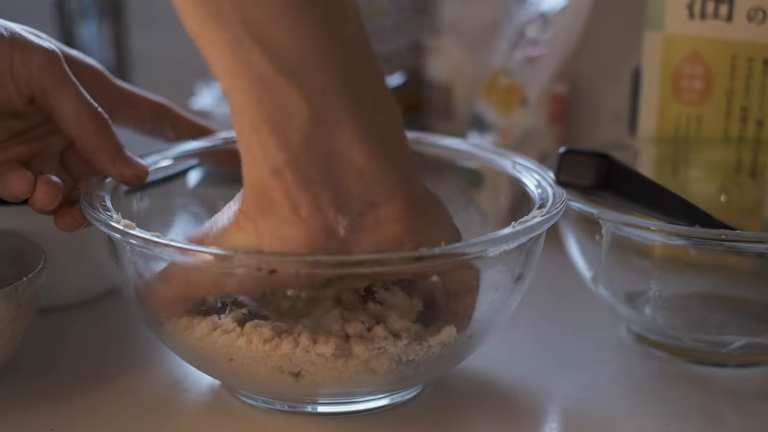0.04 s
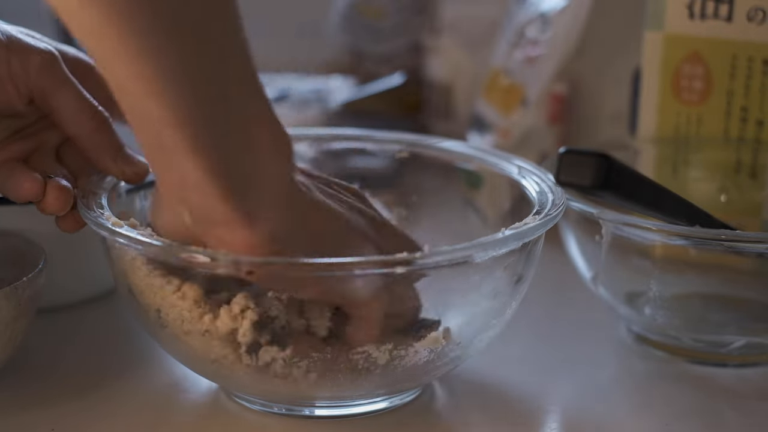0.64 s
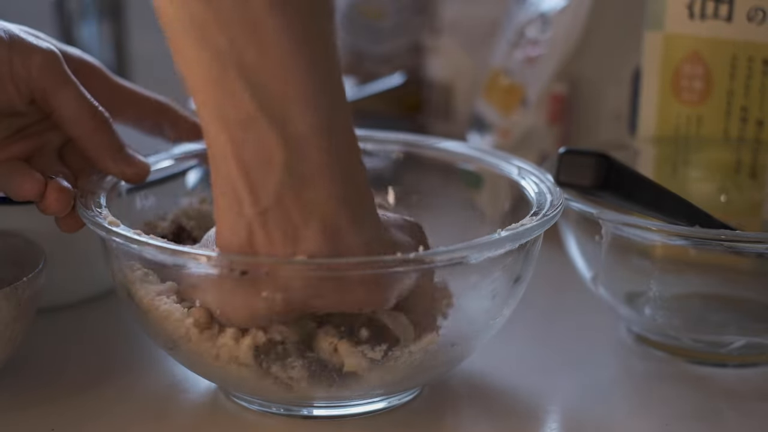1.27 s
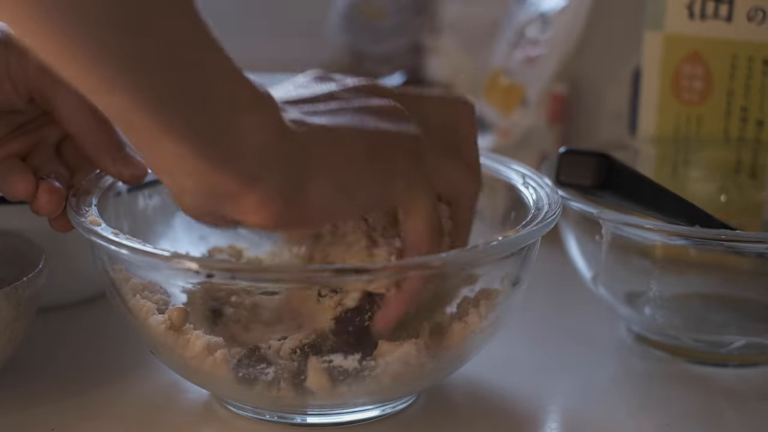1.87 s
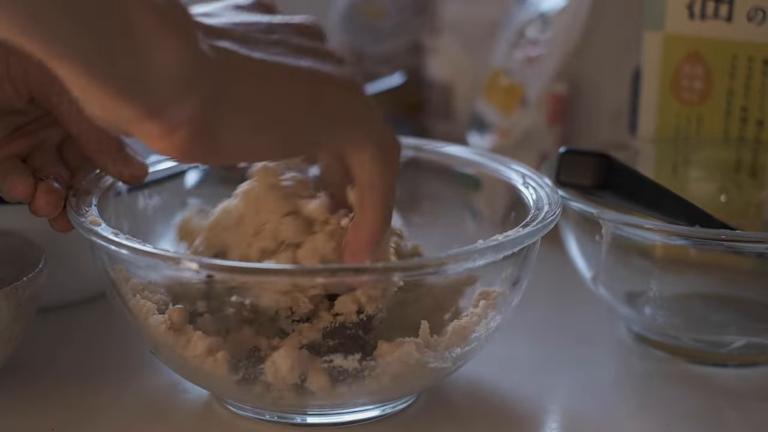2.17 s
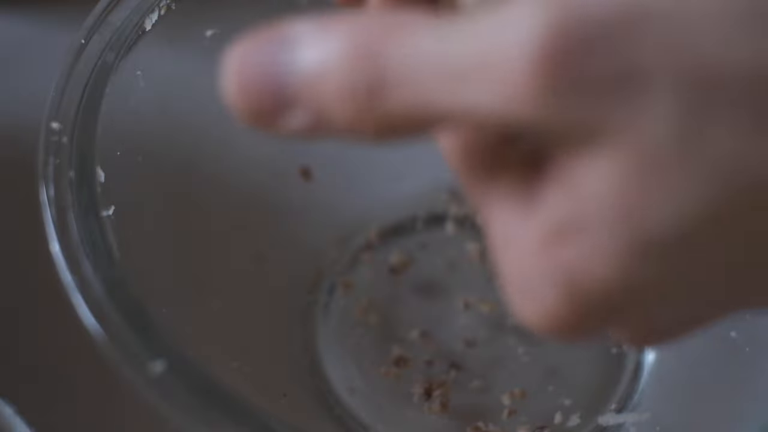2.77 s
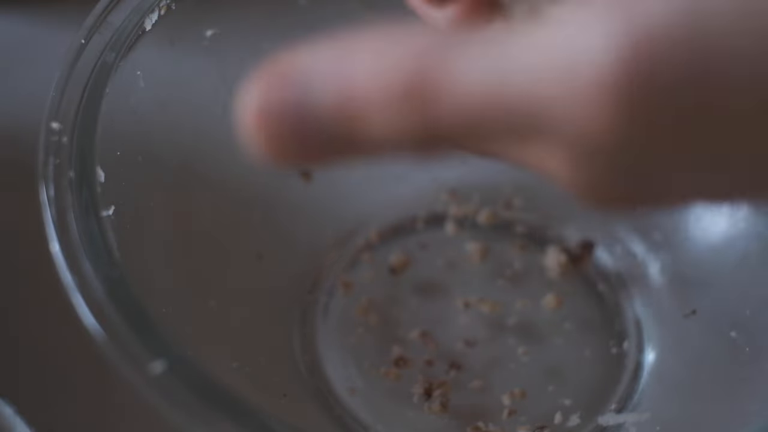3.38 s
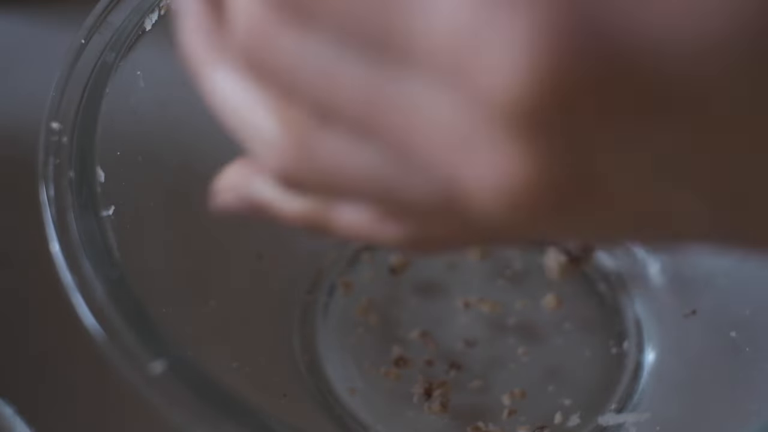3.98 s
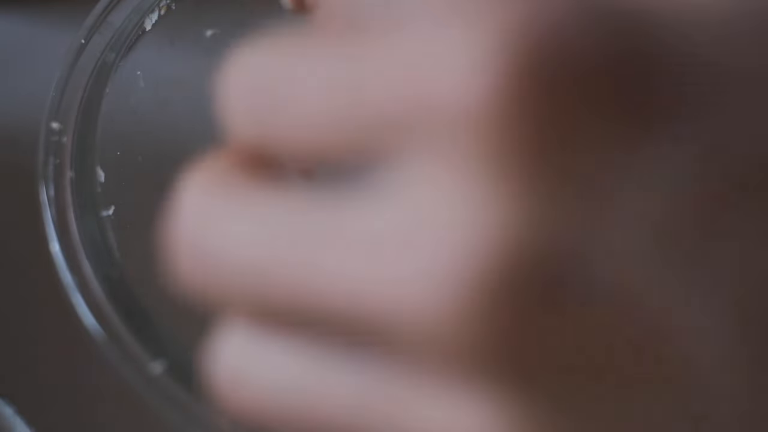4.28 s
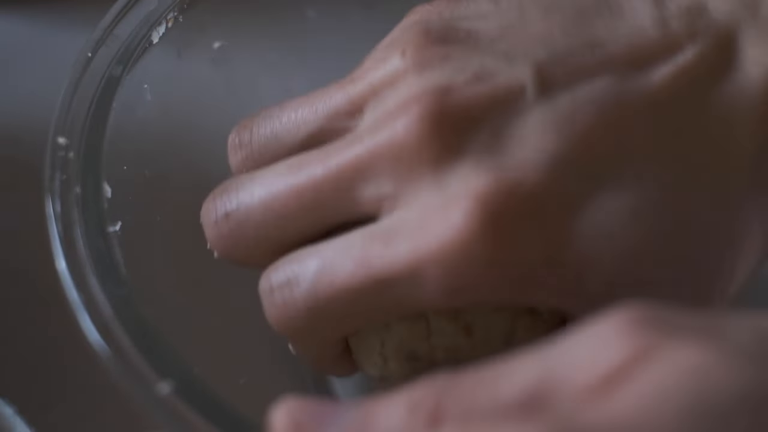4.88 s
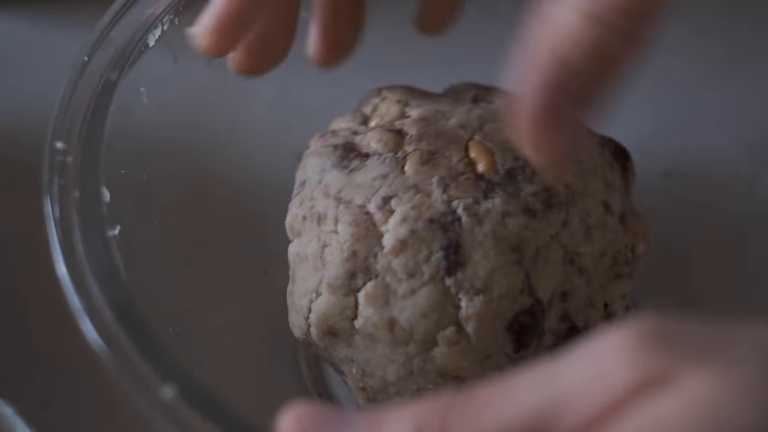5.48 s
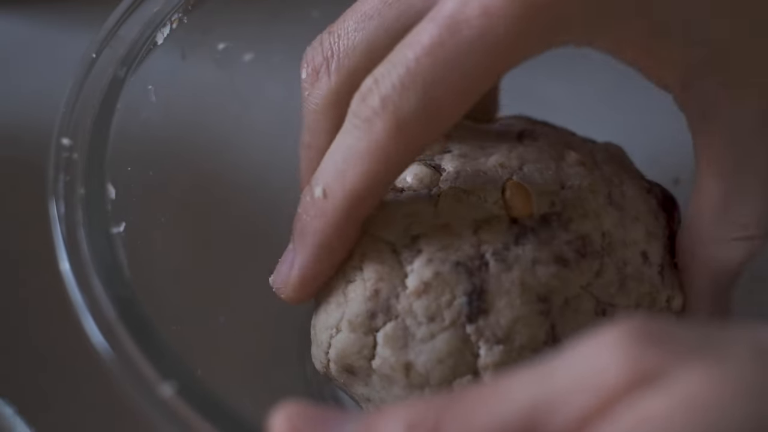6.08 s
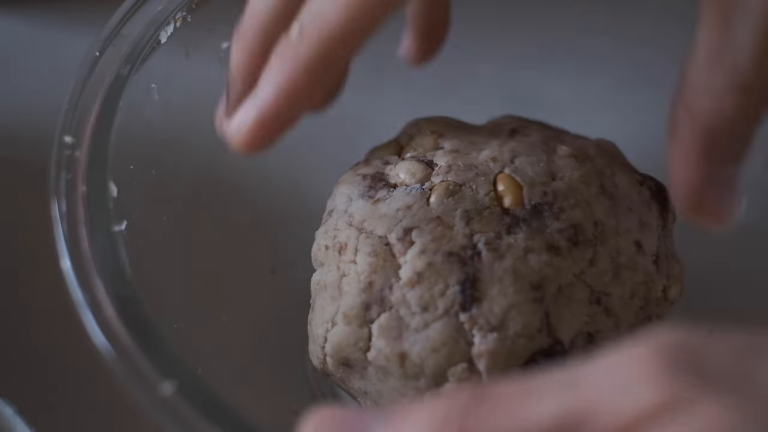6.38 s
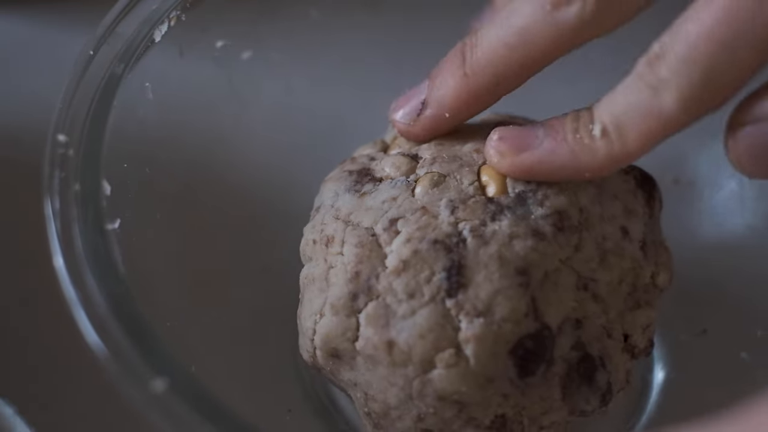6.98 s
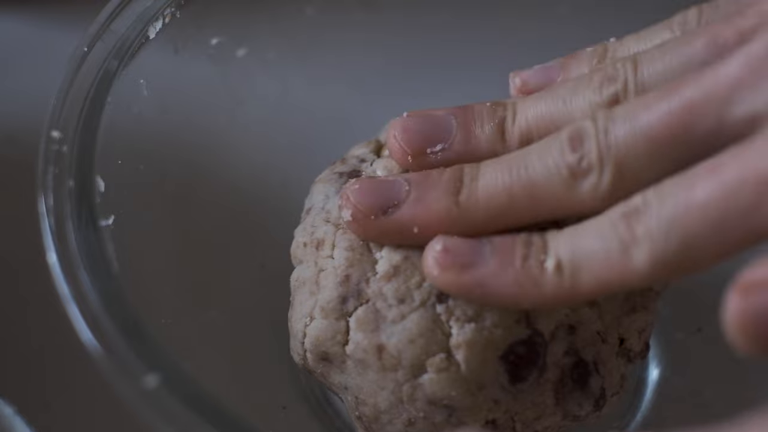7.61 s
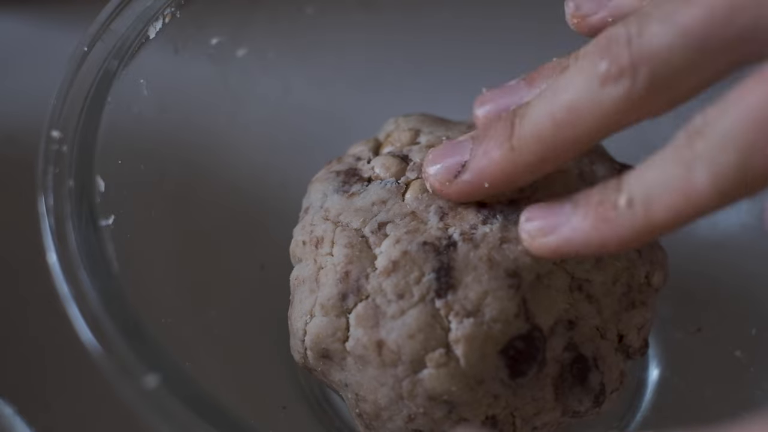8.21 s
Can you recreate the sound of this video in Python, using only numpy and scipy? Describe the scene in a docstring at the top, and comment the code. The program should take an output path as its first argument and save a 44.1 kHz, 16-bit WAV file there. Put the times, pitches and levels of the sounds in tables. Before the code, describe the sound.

Hands work crumbly dough in a glass bowl, heard close and nearly mono in a quiet kitchen with faint hiss and appliance hum. For the first 2.4 seconds they squeeze it: the dough rubs, crumbs snap sharply near 0.1 seconds, nails graze the glass, and the bowl knocks on the counter with low thuds, strongest around 1.1 to 1.2 seconds and again at 1.7. A brief, dull creak of skin on glass comes near 1.6. From about 2.5 seconds it is quieter, as the lump passes between palms with soft, moist slaps near 3.2 and 4 seconds. At 4.5 it drops into the bowl with the heaviest thud. Fingers then pat it into a ball, with soft thumps and tiny air pops, firmest around 5.5 seconds. Lighter, scattered pats continue until about 8.2, while tacky skin brushes the dough and peels away.

```python
"""Hands work crumbly dough in a glass bowl, close up and nearly mono in a quiet kitchen.
First they squeeze it: crumbs snap, nails scrape the glass, the bowl knocks and the counter thuds.
From about 2.5 s the lump is out of the bowl, passing from palm to palm with soft, moist slaps.
Near 4.5 s it drops back with the heaviest thud. Then fingers pat it into a ball, popping
little pockets of air, while tacky skin brushes the dough and peels away."""
import sys
import numpy as np
from scipy import signal
from scipy.fft import rfft, irfft, next_fast_len
from scipy.io import wavfile

SR = 44100
rng = np.random.default_rng(int(sys.argv[2]) if len(sys.argv) > 2 else 0)


def to_wav(s):
    """Save 16-bit WAV."""
    ch = np.atleast_2d(s).T  # columns
    pcm = np.round(np.clip(ch, -1, 1) * 32767)  # PCM
    wavfile.write(sys.argv[1], SR, pcm.astype(np.int16))


N = 363825
T = np.arange(N) / SR


# The low end, fist into dough or lump into bowl: (time [s], level [dB], pitch [Hz], swell [s])
DOUGH_THUDS = [(0.01, -43, 220, 0.029), (0.071, -26, 97, 0.011), (.149, -30.5, 174, 0.005),
               (0.469, -47, 114, 0.019), (0.758, -45.5, 190, 0.0096), (1.054, -32.5, 115, 0.019),
               (1.098, -19.5, 169.5, 0.0093), (1.219, -16, 99, 0.0032), (1.222, -29.5, 219.4, 0.014),
               (1.548, -44, 87, 0.024), (1.705, -36, 106, 0.01), (1.739, -32.5, 214.4, 0.02),
               (2.148, -49.5, 202, 0.011), (2.312, -42, 192, 0.0073), (2.336, -45.5, 82, 0.011),
               (4.461, -11.5, 88.2, 0.014), (4.493, -27, 221, 0.0067)]

def thuds(counter_db=-9):
    """Heavy pushes go through the dough and set the counter top ringing."""
    out = np.zeros(N)
    for s, db, hz, swell in DOUGH_THUDS:
        add(out, s, push(db, hz, swell))
    return out + undb(counter_db) * counter(out)


def push(db, hz, swell, softness=2.8, overtone_db=-20, firm_db=-20):
    """Soft dough takes a load gradually: a few low cycles swell and die."""
    t = T[:SR // 4]
    load = (t / swell * np.exp(1 - t / swell)) ** softness
    phase = 2 * np.pi * hz * t
    # dough stiffens as it is squashed, so an overtone grows late in the firmer pushes
    stiffness = np.minimum(t / swell, 2) * min(undb(db - firm_db), 1) ** .5
    return -undb(db) * load * (np.sin(phase) + undb(overtone_db) * stiffness * np.sin(2 * phase))


# Boomy modes of the counter top: (pitch [Hz], level [dB], t60 [s])
COUNTER_MODES = [(62, -2, 0.25), (92.9, 3.5, 0.33), (220, -2, 0.51), (271, -2, 0.12)]

def counter(pushes):
    """The counter top carries the bowl and rings on under its load."""
    return resonate(pushes, COUNTER_MODES)


# Fingers shape the ball: (time [s], thud level [dB], pop level [dB])
FINGER_PATS = [(4.663, -30.5, -42), (4.753, -34, -37.5), (4.901, -39.5, -40.5), (5.058, -43, -53.5),
               (5.27, -34.5, -32), (5.404, -28, -42.5), (5.494, -21, -39.5), (5.558, -28.5, -62),
               (5.991, -37, -58), (6.223, -48, -54), (6.643, -46, -59), (6.785, -42.5, -58),
               (7.057, -44.5, -48), (7.49, -53, -46), (7.561, -28, -48), (7.833, -47.5, -47),
               (7.966, -39, -50), (8.11, -49.5, -49.5), (8.182, -33, -46.5)]

def pat_thuds(hz=94.6, swell_s=0.013, lead_s=0.0029, counter_db=-19):
    """The soft body of each pat starts just before its pop and barely stirs the counter."""
    out = np.zeros(N)
    for s, db, _ in FINGER_PATS:
        add(out, s - lead_s, push(db, hz, swell_s, softness=5.7))
    return out + undb(counter_db) * counter(out)


def pat_pops(hz=884, decay_s=0.0023, stagger_s=0.01, finger_gains_db=(4, -3)):
    """Air trapped under a fingertip pops and tacky skin ticks; a second finger lands just after."""
    out, t = np.zeros(N), T[:SR // 20]
    for s, _, db in FINGER_PATS:
        for finger, gain_db in enumerate(finger_gains_db):
            skin = unit(band(rng.standard_normal(len(t)), 2200, 1))
            phase = 2 * np.pi * hz * (1 + 0.046 * rng.standard_normal()) * t
            pop = np.sin(phase) + undb(-6) * np.sin(1.38 * phase) + undb(-11) * skin
            late = finger * stagger_s * (.5 + rng.random())
            add(out, s + late, undb(db + gain_db) * pop * np.exp(-t / decay_s))
    return out


# Soft landings in a palm: (time [s], level [dB], pitch [Hz])
PALM_CATCHES = [(2.975, -45, 111), (3.153, -34, 104), (4.016, -32.5, 89.5), (4.283, -38.5, 135)]

def catches(swell_s=0.0059):
    """A palm stops the lump in the air with a short, dead thump."""
    out = np.zeros(N)
    for s, db, hz in PALM_CATCHES:
        add(out, s, push(db, hz, swell_s))
    return out


# The bowl's foot hits the counter: (time [s], level [dB], low-pass cutoff [Hz])
FOOT_KNOCKS = [(.044, -37.5, 2500), (0.134, -32.5, 1500), (.468, -38, 1970), (1.098, -15.5, 3600),
               (1.105, -22.5, 1000), (1.202, -37, 2000), (1.222, -30.5, 1080), (1.5, -38, 3960),
               (1.736, -27.5, 1430), (1.742, -23, 1020), (4.463, -37.5, 1000)]
# Clunky modes of the standing bowl: (pitch [Hz], level [dB], t60 [s])
BOWL_MODES = [(181, -10, 0.29), (277.5, -10.5, 0.11), (421, 1.5, 0.023), (660, 0, 0.041), (858, 3.5, 0.064),
              (1000, -12, 0.15), (1680, 1, 0.015), (2530, -4.5, 0.0093), (3360, -5, 0.012),
              (4280, -1, 0.013)]

def knocks(gain_db=-7, crack_db=-3, crack_s=0.016):
    """The bowl rocks onto its foot; a softer landing leaves out the high modes."""
    out, t = np.zeros(N), T[:SR // 4]
    for s, db, cutoff_hz in FOOT_KNOCKS:
        crack = unit(band(rng.standard_normal(len(t)), 850, 0.7)) * np.exp(-t / crack_s)
        blow = ring(BOWL_MODES, t) + undb(crack_db) * crack
        add(out, s, undb(db + gain_db) * signal.lfilter(*signal.butter(4, cutoff_hz, fs=SR), blow))
    return out


# Crisp accents of breaking crumbs: (time [s], level [dB], centre [Hz], decay [s])
CRUMB_SNAPS = [(.1142, -9.5, 4700, 0.00065), (.1202, -22, 5530, 0.00041), (.1248, -18, 11100, .001),
               (0.1336, -6.5, 6100, 0.0015), (0.136, -28, 8200, 0.015), (0.137, -33, 4200, 0.037),
               (.384, -45, 5700, 0.0011), (0.468, -40.5, 3960, 0.0012), (.5, -42, 7000, 0.0015),
               (1.1718, -34, 4300, 0.0013), (1.5004, -25, 1940, 0.0036), (1.501, -27.5, 9400, 0.0012),
               (1.5098, -26, 8100, 0.00031), (1.782, -31.5, 5570, 0.00088), (2.137, -40.5, 4470, 0.0012),
               (2.9918, -26, 6840, 0.0006), (3.1543, -31, 7000, 0.0012), (3.965, -42, 4000, 0.003),
               (4.02, -31.5, 3600, 0.0032), (5.007, -30, 4280, 0.00043), (5.259, -34, 3000, 0.0034),
               (5.417, -36, 4540, 0.0039), (5.599, -39.5, 4600, 0.0037), (7.518, -37, 5500, 0.0012),
               (7.8, -38.5, 4000, 0.0027)]

def snaps(tick_db=-2, scatter_db=-10, spread=0.61, tail_db=-12, tail_s=0.0051):
    """Each break is one sharp tick, then a short scatter of finer cracks."""
    out, t = np.zeros(N), T[:SR // 12]
    for s, db, hz, decay in CRUMB_SNAPS:
        tick = band(t == 0, hz, spread)
        tick /= np.abs(tick).max()
        fade = np.exp(-t / decay) + undb(tail_db) * np.exp(-t / tail_s)
        scatter = fade * unit(band(rng.standard_normal(len(t)), hz, spread, order=2))
        add(out, s, undb(db) * (undb(tick_db) * tick + undb(scatter_db) * scatter))
    return out


# Dough smacks palm or glass: (time [s], level [dB], centre [Hz], decay [s])
DOUGH_SLAPS = [(0.4693, -36, 1110, 0.0019), (1.218, -40, 1160, 0.014), (2.346, -47, 764, 0.012),
               (3.153, -25.5, 1770, 0.0032), (3.1536, -32.5, 276, 0.0031), (4.021, -48, 1180, 0.0022),
               (4.48, -44.5, 1400, 0.013), (4.476, -26, 330, 0.017), (4.589, -48, 1200, 0.014),
               (4.662, -50, 1080, 0.008), (5.409, -42, 288, 0.015), (5.496, -40, 686, 0.005),
               (5.505, -47, 256, 0.025)]

def slaps(rise_s=0.0017):
    """Moist dough flattens at once, with a dull burst and no ring."""
    out, t = np.zeros(N), T[:SR // 6]
    for s, db, hz, decay in DOUGH_SLAPS:
        burst = unit(band(rng.standard_normal(len(t)), hz, 1.0, order=2))
        add(out, s, undb(db) * burst * np.exp(-t / decay) * (1 - np.exp(-t / rise_s)))
    return out


# Fingers and nails graze the glass: (time [s], level [dB], decay [s], brightness [dB/octave])
GLASS_SCRAPES = [(.0, -55, 0.092, -18), (.06, -47, 0.05, -13.5), (.133, -37, 0.0083, 1.5),
                 (1.04, -49.5, 0.082, -3), (1.151, -45.5, 0.039, -2.5), (1.251, -48.5, 0.01, -20),
                 (1.74, -50, 0.03, 1), (2.315, -53.5, 0.036, -1), (4.664, -49, 0.039, 2),
                 (4.744, -44.5, 0.019, -0.5), (5.529, -59, 0.032, 4), (5.828, -70, 0.022, 6),
                 (6.249, -66, 0.019, 3), (7.269, -59, 0.11, 8)]
# Bright modes of the hand-damped glass wall: (pitch [Hz], level [dB], t60 [s])
GLASS_MODES = [(1929, -3, 0.14), (3594, -3.5, 0.045), (4500, -9, 0.015), (5450, -13, .06),
               (7800, -22.5, 0.015), (8740, -9, 0.022), (10800, -13, 0.028), (12000, -12, 0.035)]

def scrapes(gain_db=-7, friction_db=-4, contact_scatter_db=1.5):
    """A scraping fingertip feeds the glass wall unevenly, so it rings roughly amid the friction."""
    out, t = np.zeros(N), T[:SR // 3]
    for s, db, decay, tilt in GLASS_SCRAPES:
        # each place of contact favours other modes
        contact = contact_scatter_db * rng.standard_normal(len(GLASS_MODES))
        modes = [(hz, mode_db + contact_db + tilt * np.log2(hz / GLASS_MODES[0][0]), t60)
                 for (hz, mode_db, t60), contact_db in zip(GLASS_MODES, contact)]
        friction = rng.standard_normal(len(t)) * np.exp(-t / decay)
        ringing = signal.fftconvolve(friction, ring(modes, t))[:len(t)]
        ringing /= np.std(ringing[:SR // 20])
        add(out, s, undb(db + gain_db) * (ringing + undb(friction_db) * friction))
    return out


# The hand closes, holds and lets go: (time [s], hold [s], rub level [dB], crumble level [dB])
HAND_SQUEEZES = [(-.04, 0.16, -49.5, -60.5), (0.105, 0.12, -72, -53.5), (0.311, 0.38, -61, -60.5),
                 (1.066, .17, -51, -57.5), (1.472, 0.3, -55.5, -62.5), (1.866, .28, -67, -68),
                 (2.663, 0.49, -76, -62), (3.234, 0.1, -63, -67), (3.65, .34, -67.5, -64),
                 (4.504, 0.29, -57.5, -74), (4.777, 0.074, -56, -56), (4.898, 0.46, -68.5, -58.5),
                 (5.445, 0.18, -60, -79), (6.342, 0.14, -73, -70), (6.62, 0.12, -68, -68),
                 (7.205, 0.44, -66.5, -62.5)]
# Mid-heavy EQ of rubbing dough: (frequency [Hz], level [dB])
RUB_EQ = [(150, 2.5), (300, -12.5), (600, 10.5), (900, 8), (1400, 1.5), (2400, 3), (4300, -13.5),
          (6500, -14), (16000, -78)]
# Fizzy EQ of crumbling dough: (frequency [Hz], level [dB])
CRUMBLE_EQ = [(800, -3), (2500, 2.5), (4300, 4), (7000, -4), (9500, -5), (12000, -5.5), (14500, -7.5),
              (16000, -5)]
# Dark EQ of the shaking counter: (frequency [Hz], level [dB])
RUMBLE_EQ = [(20, -43), (45, -4), (70, 2.5), (110, -1), (160, -7), (215, -4), (280, -7.5), (500, -14.5),
             (1200, -58)]

def squeezes(attack_s=0.031, release_s=0.1, lift_s=2.45, drop_s=4.46):
    """Each squeeze makes the dough rub and crumble, and the arm's weight rumbles in the counter."""
    rub_level, crumble_level = undb(-69.5), undb(-65.5)  # the hands never quite stop
    for start, hold, rub_db, crumble_db in HAND_SQUEEZES:
        release = np.exp(-np.maximum(T - start - hold, 0) / release_s)
        pressure = np.clip((T - start) / attack_s, 0, 1) * release
        rub_level = np.hypot(rub_level, undb(rub_db) * pressure)
        crumble_level = np.hypot(crumble_level, undb(crumble_db) * pressure)
    in_bowl = (T < lift_s) | (T > drop_s)
    grip = undb(1.5 * walk(70) + walk(9) - 1)
    rub = rub_level * grip * unit(colour(grains(rate=5000, scatter_db=4), RUB_EQ))
    # until the lump is lifted out, rubbing keeps the two lowest glass modes singing
    singing = undb(7) * resonate(rub * (T < lift_s), GLASS_MODES[:2])
    tack = grains(rate=9000, scatter_db=2)
    crumbs = 0.51 * grains(rate=200, scatter_db=3)
    fizz = crumble_level * grip * unit(colour(tack + crumbs, CRUMBLE_EQ))
    tinkle = undb(-3) * resonate(fizz * in_bowl, GLASS_MODES[3:])
    rumble = rub_level * in_bowl * undb(3) * noise(RUMBLE_EQ)
    return rub + singing + fizz + tinkle + rumble


def shudder(pushes, gain_db=-17, settle_s=0.09):
    """The counter and what stands on it go on shaking after each push."""
    keep = np.exp(-1 / (settle_s * SR))
    shaking = signal.lfilter([1 - keep], [1, -keep], np.abs(pushes))
    return undb(gain_db) * shaking * noise(RUMBLE_EQ)


# Quick swishes of skin: (peak time [s], half length [s], level [dB], centre [Hz], spread [ratio])
SKIN_STROKES = [(0.088, 0.017, -50, 9000, 0.96), (0.506, 0.014, -51.5, 860, 0.16),
                (1.8, 0.029, -52.5, 5560, 0.23), (2.947, 0.029, -49.5, 4300, 0.68),
                (3.769, 0.031, -49, 4300, 0.97), (4.853, 0.036, -51.5, 1880, 0.37),
                (5.278, 0.023, -41.5, 3370, 0.86), (5.279, 0.022, -42.5, 1010, 0.13),
                (6.112, 0.028, -56.5, 470, 0.16), (6.817, 0.009, -51.5, 4700, 0.38),
                (7.008, 0.033, -55.5, 1030, 0.55), (7.448, 0.03, -58, 6900, 2),
                (7.786, 0.053, -56, 5900, 0.85)]

def strokes(gain_db=-1):
    """Skin slides over the dough in a swell of tiny slips."""
    out, slips = np.zeros(N), grains(rate=4000, scatter_db=3.3)
    for s, half, db, hz, spread in SKIN_STROKES:
        near = np.abs(T - s) < 3 * half
        swell = np.exp(-((T[near] - s) / half) ** 2 / 2)
        out[near] += undb(db + gain_db) * swell * unit(band(slips[near], hz, spread))
    return out


# Tacky skin lifts off the dough: (time [s], level [dB])
SKIN_PEELS = [(2.352, -48.5), (2.629, -53), (4.008, -53.5), (4.464, -49.5), (5.402, -52), (5.492, -48),
              (5.558, -53), (5.595, -62), (5.64, -56), (6.032, -57), (6.201, -59), (7.574, -55), (8.1, -59),
              (8.204, -59)]

def peels(swell_s=0.0066, centre_hz=5830):
    """Sticky threads part one after another in a short crisp burst."""
    effort, t = np.zeros(N), T[:SR // 10]
    for s, db in SKIN_PEELS:
        add(effort, s, undb(db) * t / swell_s * np.exp(1 - t / swell_s))
    return effort * unit(band(grains(rate=9900, scatter_db=3.5), centre_hz, spread=2.4))


def creak(start_s=1.54, end_s=1.635, rate_hz=150, body_db=-13):
    """The heel of the hand sticks and slips on the glass in a quick run of dull ticks."""
    out, t = np.zeros(N), T[:SR // 20]
    gap_jitter, sizes = rng.standard_normal((40, 2)).T
    times = start_s + np.cumsum(np.exp(.2 * gap_jitter)) / rate_hz
    tick = np.sin(2 * np.pi * 2200 * t) * np.exp(-t / .0004)
    body = undb(body_db) * ring(BOWL_MODES, t) * np.exp(-t / .008)
    for s, size in zip(times[times < end_s], sizes):
        add(out, s, undb(-36.5 + 2 * size) * (tick + body))
    return signal.lfilter(*signal.butter(2, 4000, fs=SR), out)


# Warm EQ of the reverb tail: (frequency [Hz], level [dB])
ECHO_EQ = [(30, 6), (60, 7.5), (130, 5.5), (215, 11.5), (400, 1), (2000, -2.5), (4500, -7), (9000, -11),
           (16000, 0.5)]

def kitchen_echo(x, t60_s=0.21, wet_db=-14.5, build_s=0.0055):
    """Counter top and walls throw back a short, diffuse echo."""
    t = T[:SR // 2]
    envelope = np.exp(-np.log(1000) * t / t60_s) * (1 - np.exp(-t / build_s))
    tail = colour(rng.standard_normal(len(t)), ECHO_EQ) * envelope
    return undb(wet_db) * signal.fftconvolve(x, tail / np.sqrt(np.sum(tail ** 2)))[:N]


# Low bed of kitchen air: (frequency [Hz], level [dB])
AIR_EQ = [(20, -22), (45, 7), (80, 5.5), (190, 1.5), (280, -6.5), (365, -3.5), (600, -14.5), (1300, -15),
          (4000, -35.5), (8000, -35), (16000, -39)]

def room_tone(air_db=-62.5, hum_hz=364, hum_db=-76):
    """Still air and the faint wavering hum of an appliance."""
    hum = undb(hum_db + 2 * walk(3.19)) * np.sin(2 * np.pi * hum_hz * T + walk(14.0))
    return undb(air_db) * noise(AIR_EQ) + hum


# Nearly flat noise floor: (frequency [Hz], level [dB])
HISS_EQ = [(60, -5.5), (400, -4), (1500, -10.5), (16000, -9)]

def capsule_hiss(level_db=-68):
    """Each of the two microphone capsules adds its own self-noise."""
    return undb(level_db) * np.array([noise(HISS_EQ), noise(HISS_EQ)])


def undb(db):
    """Decibels to amplitude."""
    return 10 ** (np.asarray(db) / 20)


def unit(x):
    """Scale to rms 1."""
    return x / np.sqrt(np.mean(x ** 2))


def add(track, s, x):
    """Mix x into the track from time s on."""
    i = max(int(s * SR), 0)
    track[i:i + len(x)] += x[:max(N - i, 0)]


def colour(x, points):
    """Apply an EQ curve of (frequency [Hz], level [dB]) points."""
    hz, db = np.transpose(points)
    size = next_fast_len(len(x))
    f = np.maximum(np.arange(size // 2 + 1) * SR / size, 1)
    gain = undb(np.interp(np.log(f), np.log(hz), db))
    return irfft(rfft(x, size) * gain, size)[:len(x)]


def noise(eq):
    """Steady noise through an EQ curve, rms 1."""
    return unit(colour(rng.standard_normal(N), eq))


def band(x, hz, spread, order=1):
    """One broad resonance reaching a factor of 1 + spread to each side of hz."""
    edges = [hz / (1 + spread), min(hz * (1 + spread), SR / 2 - 1000)]
    return signal.lfilter(*signal.butter(order, edges, "band", fs=SR), x)


def ring(modes, t):
    """Free decay of a body's modes after a blow."""
    return sum(undb(db) * np.sin(2 * np.pi * hz * t) * np.exp(-np.log(1000) * t / t60)
               for hz, db, t60 in modes)


def resonate(x, modes):
    """Drive a body's modes with x; the loudest steady response has gain 1."""
    response = ring(modes, T[:SR // 2])
    return signal.fftconvolve(x, response / np.abs(rfft(response)).max())[:N]


def walk(rate):
    """Smooth random wandering with a spread near 1."""
    return np.interp(T * rate, np.arange(4096), rng.standard_normal(4096))


def grains(rate, scatter_db):
    """Tiny slips of uneven size, about rate per second, rms 1."""
    size = undb(scatter_db * np.minimum(rng.exponential(size=N), 5))
    return unit((rng.random(N) < rate / SR) * size * rng.choice([-1, 1], N))


def scene(side_db=-17):
    """Everything sits in the centre; only a trace of bright echo and the hiss give width."""
    detail = knocks() + slaps() + snaps() + peels() + scrapes()
    detail += pat_pops() + strokes() + creak() + squeezes()
    pushes = thuds() + pat_thuds() + catches()
    direct = detail + pushes + shudder(pushes)
    mid = direct + kitchen_echo(direct) + room_tone()
    side = undb(side_db) * kitchen_echo(band(detail, 11000, 0.33))
    return np.array([mid + side, mid - side]) + capsule_hiss()


def record(dry, low_cut_hz=36, high_cut_hz=15900):
    """Roll off the deepest rumble and cut the very top steeply."""
    lean = signal.sosfilt(signal.butter(2, low_cut_hz, "high", fs=SR, output="sos"), dry)
    return signal.sosfilt(signal.ellip(10, .2, 70, high_cut_hz, fs=SR, output="sos"), lean)


dry = scene()
out = record(dry)
to_wav(out)
```